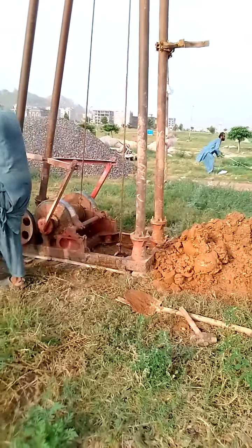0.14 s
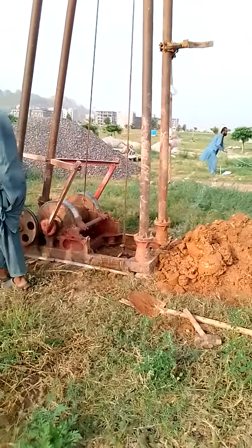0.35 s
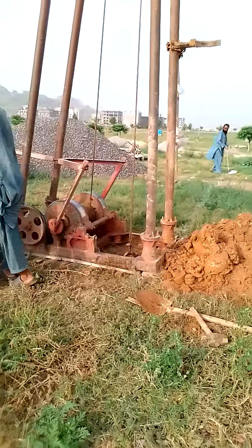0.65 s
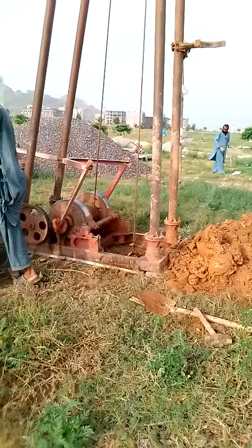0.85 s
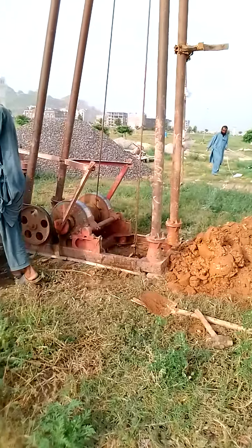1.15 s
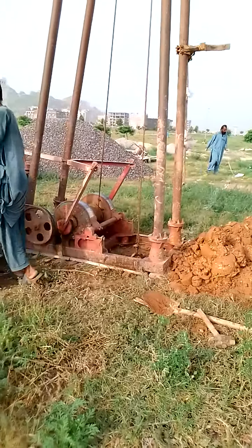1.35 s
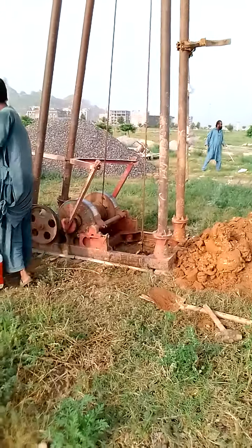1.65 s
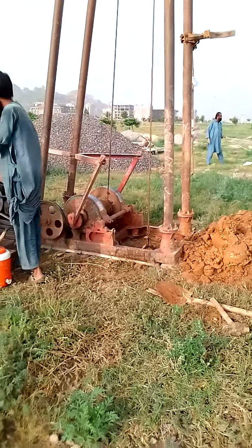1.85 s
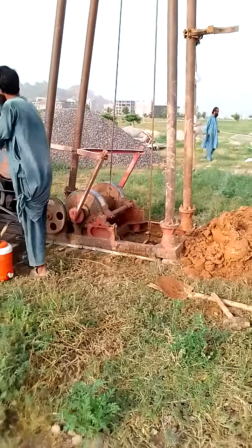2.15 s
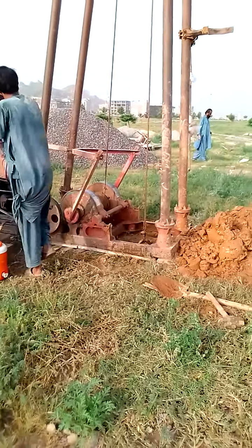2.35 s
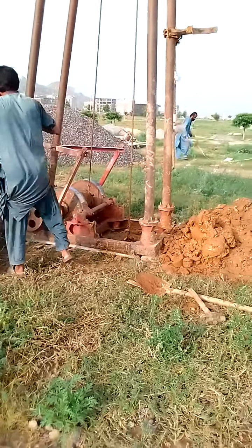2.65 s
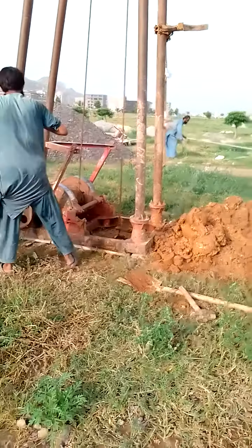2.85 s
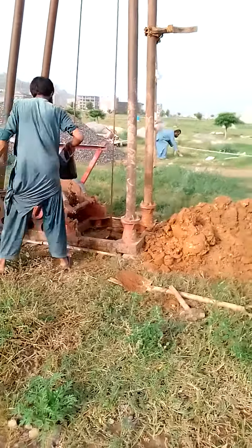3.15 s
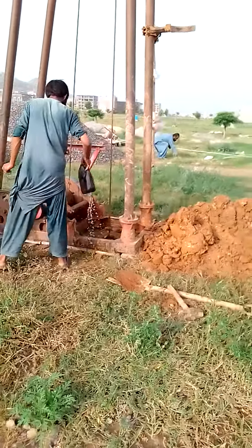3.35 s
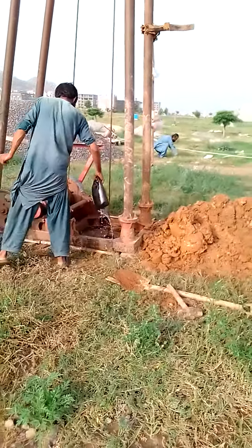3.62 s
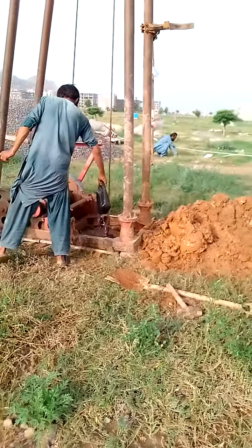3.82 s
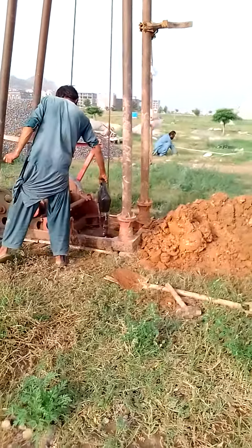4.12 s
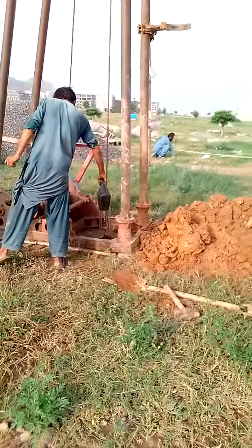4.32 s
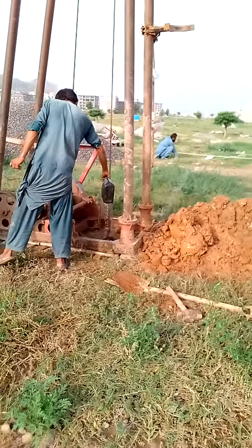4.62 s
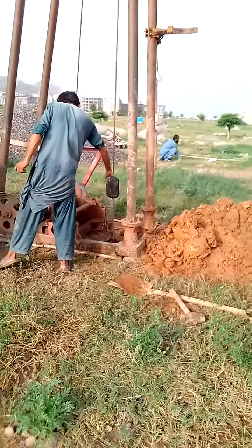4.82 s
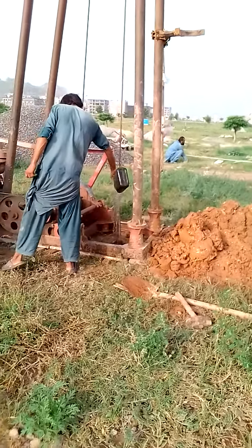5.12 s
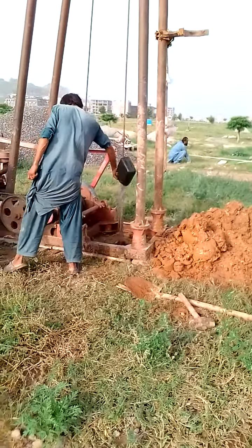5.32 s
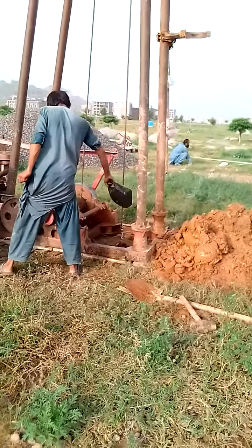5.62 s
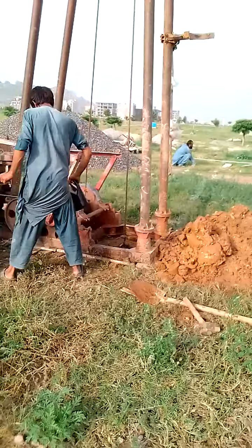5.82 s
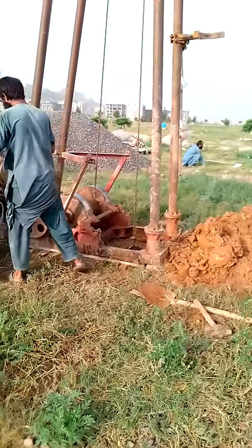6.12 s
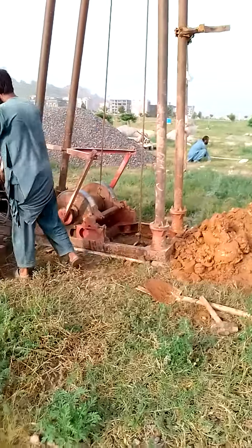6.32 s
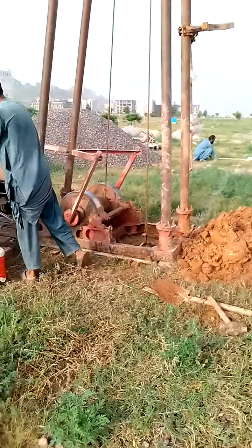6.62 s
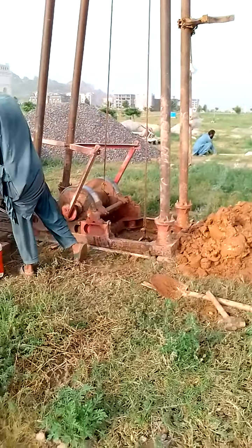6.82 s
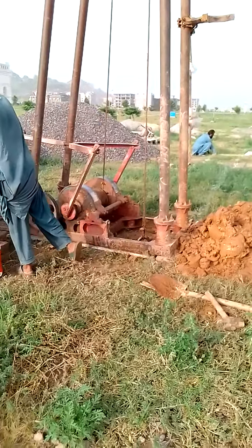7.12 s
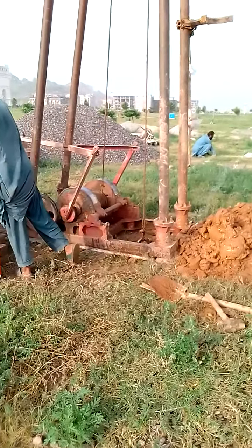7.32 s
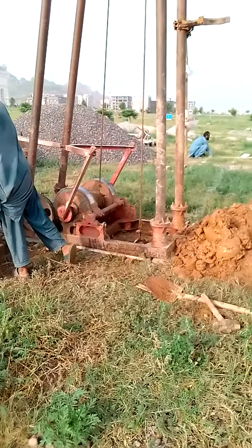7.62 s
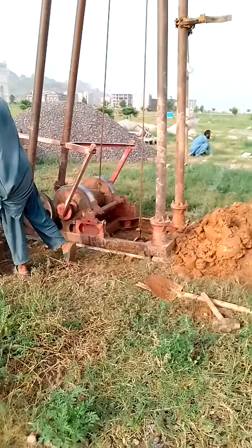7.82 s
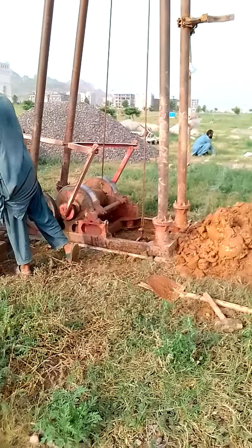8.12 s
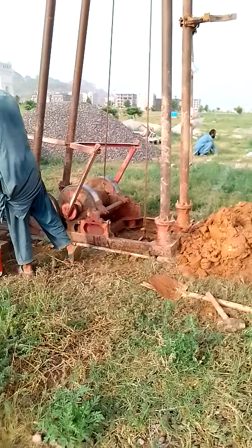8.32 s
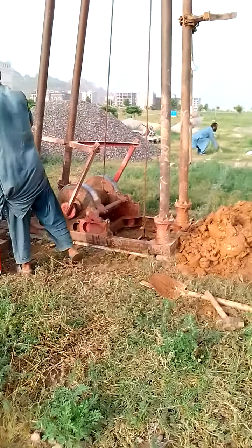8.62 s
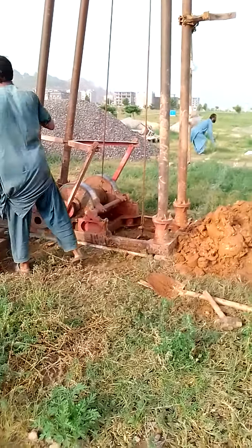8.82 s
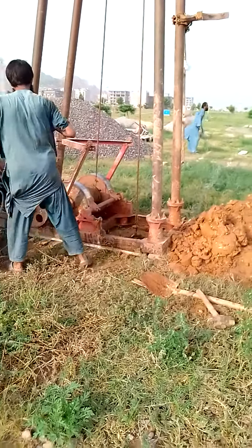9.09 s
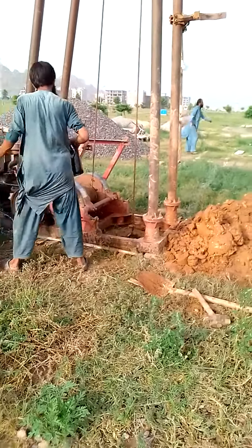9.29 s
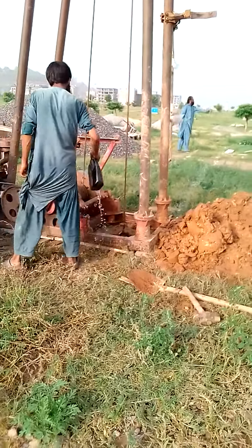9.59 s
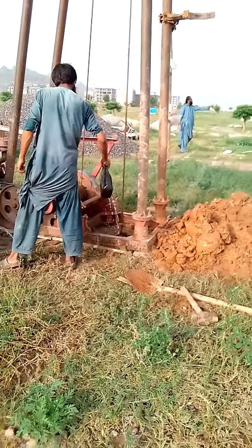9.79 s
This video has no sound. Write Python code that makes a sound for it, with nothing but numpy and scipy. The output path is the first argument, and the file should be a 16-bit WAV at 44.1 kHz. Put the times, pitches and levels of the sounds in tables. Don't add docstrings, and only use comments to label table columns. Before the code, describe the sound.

Close outdoor idle of an old one-cylinder engine: fast even chugging, iron knocks and valve ticks over gear whirr, a thin can rattling near the end.

```python
import sys
import numpy as np
from scipy import signal
from scipy.fft import rfft, irfft
from scipy.io import wavfile
from scipy.ndimage import uniform_filter1d

SR = 44100
rng = np.random.default_rng(int(sys.argv[2]) if len(sys.argv) > 2 else 0)


def output_pcm(signal):
    pcm = np.clip(np.atleast_2d(signal).T, -1, 1) * 32767
    wavfile.write(sys.argv[1], SR, np.round(pcm).astype(np.int16))


def voltage_ratio(level):
    return 10 ** (np.asarray(level, float) / 20)


N = 438794

THIRD_THUMPS = [-0.0355, 0.6058, 1.2501, 1.8948, 2.5398, 3.1825, 3.8283, 4.4759, 5.1188, 5.7639, 6.4104,
                7.057, 7.7037, 8.3524, 9.0048, 9.6522, 10.3020]
# (time of the knock [s], extra fuel [0-1], late light-up [0-1])
HEAVY_SHOTS = [(.064, 0.4, 0.13), (.28, 0.65, 0.17), (.493, 0.4, 0.05), (.922, 0.54, .02), (1.353, .7, 0),
               (1.997, 0.76, 0), (2.426, 0.8, 0), (2.64, .6, .35), (3.068, 1, 0.22), (3.501, 0.84, 0.13),
               (4.148, 0.9, .02), (4.578, 0.98, 0), (4.796, .8, 1), (5.22, 0.53, 0), (5.441, 0.73, 0.26),
               (5.649, 0.66, 0), (5.87, 0.63, 0.23), (6.296, 1, 0), (6.73, 1, 0.64), (7.16, 1, .1),
               (7.59, 0.83, 0.14), (8.023, 0.82, 0.08), (8.46, 0.7, .2), (8.893, 1, 0), (9.321, 0.98, 0),
               (9.76, 1, 0.12)]

# (frequency [Hz], level [dB])
AIR_COLOUR = [(35, -18), (55, 3), (90, 2), (160, -2), (300, -9), (1000, -30.)]

# (frequency [Hz], width [Hz], then level [dB] under
CASTING_MODES = [(238.4, 52.5, 17.5, 16, 4, 19, -1, 1.5), (267, 41, 23.5, -10, -1, 14, 16.5, 0.5),
                 (331.2, 28.8, 10.5, 11, 21.5, 26.5, 8, 5.5), (403, 253, 6.5, 10, -31, -4, -38, -4.5),
                 (572, 64, 17, -31, -18, 4.5, 20, -11), (710.5, 107, 11.5, -29, 7.5, 22, -10, 2.5),
                 (829, 84, -1, 7, 14.5, 16.5, -41, -0.5), (974, 210, 3, -11, 11.5, -10, -27, -3),
                 (1218, 161, 3, -2, 14.5, 12, -23, -7), (1470, 300, -11, -41, -27, -4.5, -13, -11.5),
                 (1680, 430, -4, 2.5, -6, -17, -5, -13.5), (2200, 720, -3, -3, -10, 2.5, -4, -14.5),
                 (2830, 268, 5.5, -26, 9.5, -6, -1, -9), (3053, 150, -0.5, -15, 6.5, 6.5, 8, -16),
              (3578, 500, 6.5, -2, 5.5, 0, 2, -12.5), (3996, 540, 3, 10.5, 8.5, 0, 0, -13.5),
              (4469, 162, 12, 20.5, 2.5, -7, 23, -19), (4707, 156, 8, 16, 7.5, 1, 8, -14.5),
              (5350, 310, 5, 5, 8.5, -6.5, 13.5, -20.5), (5850, 680, 4.5, 1, 0, -13, 4.5, -24),
              (6390, 290, 4, 20, -15, -24, -14, -16.5), (6984, 3100, -1.5, -20, -14, -1.5, -5, -17.5),
              (8860, 1000, 2, 11.5, 3, -6, -3, -18), (10700, 5100, -9, 0, -9, -9, -11, -13.5),
              (12900, 3200, 3.5, 12.5, -3, -21, -0.5, -21), (14600, 1500, 2, 7, -13, 1, -24, -11.5),
                 (596.7, 6.8, 5, -16, 13, 18.5, 19.5, -12), (723, 24, 12.5, -24, -6, 22, -19, -7.5),
               (2974, 52, -4, -13, 14.5, -0.5, -4, -10), (14900, 610, 1, 9, -8., -6., 2, -20)]
# (place in the cycle [0-1], timing scatter [s], rise [s], decay [s],
# tail decay [s], tail [dB], gain [dB])
BLOWS = [
    (-.042, 0.00087, 0.0022, 0.012, 0.0085, -13.5, -47.5),
    (0.242, 0.00049, 0.0014, 0.0044, 0.0048, -15, 5),
    (0.458, 0.001, 0.0011, 0.008, 0.038, -18, -0.67),
    (0.497, 0.00022, 0.0019, 0.0043, 0.028, -15, 0.16),
    (0.667, 0.0006, 0.0011, 0.0034, 0.038, -19.5, -4),
]
# (lag [s], rise [s], decay [s], gain [dB])
EDGES = [(-.001, 0.00066, 0.0046, 5), (-.0005, 0.0004, 0.009, 1), (0.0025, .001, 0.007, -4),
         (-0.0035, .001, 0.0032, -4), (.006, 0.0025, 0.0061, 4)]
# (lean level [dB], body gain at full fuel [dB], edge gain at full fuel [dB],
# scatter [dB])
STRENGTHS = [(-0.05, -0.1, .1, 0.84), (-57, -0.5, -0.2, 0.5), (-46, 2, 5, 0.86), (-55.5, 11.5, 10, 0.3),
             (-47.5, 0.5, 15, 0.6)]
LATE_CHANGES = [.1, .1, -12, 4, .1]
# (place in the cycle [0-1], level [dB])
ROCKER_TICKS = [(-.085, -56.5), (.212, -64.5), (0.421, -63), (0.569, -79)]
# (time [s], treble [dB])
LINE_OF_SIGHT = [(0, 2.5), (.45, 2.5), (.75, -1.5), (2.799, -0.1), (3.201, 2.5), (4.6, 2.5), (5.948, 2.5),
                 (6.3, -1), (7.5, -0.7), (9.101, -1.8), (9.4, 2), (9.95, 3)]

# (place in the cycle [0-1], frequency [Hz], t60 [s],
# level [dB])
GULPS = [(.70, 72.8, 0.073, -67.5), (.235, 131, 0.027, -63), (0, 82, 0.03, -69), (0, 131, 0.024, -57),
         (.5, 84, 0.052, -82)]
# (frequency [Hz], t60 [s], signed size)
PIPE_MODES = [(127, .08, -.042), (183, .12, -.008), (301, .078, .074), (335, .072, -.062)]

# (frequency [Hz], level [dB], t60 [s])
CAN_MODES = [(4770, 0., .33), (3800, -11., .25), (4830, -4., .2)]
# (time [s], level [dB])
CAN_SHAKING = [(0, -41), (9.4, -46), (9.52, -10), (9.7, -15), (9.95, -13)]
# (time [s], level [dB])
CAN_TAPS = [(9.4898, -23), (9.5806, -17), (9.80, -24), (9.921, -17)]
# (time [s], level [dB])
GUARD_SHAKING = [(0, -41), (.6, -49), (1.4, -47), (2.1, -44.5), (2.798, -47.5), (5, -53), (6.999, -46),
                 (9.95, -47)]
# (time [s], level [dB])
LOUD_PINGS = [(1.997, -50), (2.163, -45), (2.167, -47), (2.254, -48), (2.807, -49), (3.328, -49)]
# (time [s], level [dB])
SNAPS = [(2.6763, -44), (3.4825, -62), (3.536, -52), (9.5124, -58), (9.5267, -54), (9.5627, -57),
         (9.5981, -52), (9.624, -55), (9.7244, -58)]
# (time [s], level [dB])
BAR_STRIKES = [(2.6782, -35), (9.4898, -52), (9.581, -47)]
# (frequency [Hz], level [dB], t60 [s])
BAR_MODES = [(3570, -5, 0.054), (4700, -23, 0.047), (4920, -3.5, 0.052), (5540, -12, .05), (4160, 0, .02),
             (3800, -14, 0.022), (5300, -2, 0.022), (9200, -5, .02)]
# (time [s], level [dB])
DRUM_SLACK = [(3.51, -54), (4.155, -46), (4.586, -47), (4.797, -41), (5.018, -48), (5.232, -47),
              (5.66, -53), (6.74, -52), (8.9, -45)]
# (frequency [Hz], level [dB], t60 [s])
DRUM_MODES = [(745, .1, .08), (690, -6, .16), (598, -9, .3)]

# (frequency [Hz], level [dB])
MIC_COLOUR = [(30, -3), (60, 0.), (5000, 0.), (7000, -15), (10000, -18.5), (15000, -13.5), (20000, -22)]

TOP_OCTAVE_HZ = 7000


def level(x, db):
    return x * voltage_ratio(db) / np.sqrt(np.mean(x ** 2))


def glide(table):
    s, value = np.transpose(table)
    return np.interp(np.arange(N) / SR, s, value)


def walk(rate):
    count = int(N / SR * rate) + 2
    return 0.93 * np.interp(np.arange(N) * rate / SR, np.arange(count), rng.standard_normal(count))


def colour(x, table):
    hz, db = np.transpose(table)
    grid = np.maximum(np.fft.rfftfreq(4096, 1 / SR), 1)
    curve = voltage_ratio(np.interp(np.log(grid), np.log(hz), db))
    cepstrum = irfft(np.log(curve))
    cepstrum[1:2048] *= 2
    cepstrum[2049:] = 0
    return signal.fftconvolve(x, irfft(np.exp(rfft(cepstrum))))[:N]


def highpass(x, order, hz):
    return signal.sosfilt(signal.butter(order, hz, "high", fs=SR, output="sos"), x)


def ring(x, hz, t60, turn=-1j):
    pole = np.exp(2j * np.pi * hz / SR - np.log(1000) / (t60 * SR))
    return (turn * signal.lfilter([1], [1, -pole], x)).real


def ring_modes(x, modes):
    return sum(voltage_ratio(db) * ring(x, hz, t60) for hz, db, t60 in modes)


def spikes(s, size):
    at = np.asarray(s) * SR
    keep = (at >= 0) & (at < N - 2)
    whole, part = at[keep].astype(int), at[keep] % 1
    size = (size * np.ones(len(at)))[keep]
    return np.bincount(whole, size * (1 - part), N) + np.bincount(whole + 1, size * part, N)


def taps(table):
    s, db = np.transpose(table)
    return spikes(s, voltage_ratio(db))


def blow(s, db, rise, decay, tail, tail_db):
    kicks = spikes(s, voltage_ratio(db))

    def fade(rate):
        return signal.lfilter([1], [1, -np.exp(-rate / SR)], kicks)

    def swell(fall):
        return fade(1 / fall) - fade(1 / fall + 1 / rise)

    return swell(decay) + voltage_ratio(tail_db) * swell(tail)


def thumps():
    marks = 3 * np.arange(len(THIRD_THUMPS))
    return np.interp(np.arange(marks[-1]), marks, THIRD_THUMPS)


def moments(place):
    s = thumps()
    return s + place * np.diff(s, append=2 * s[-1] - s[-2])


def fuel(axis=1):
    table = np.transpose(HEAVY_SHOTS)
    cycle = np.searchsorted(thumps(), table[0]) - 1
    return np.bincount(cycle, table[axis], len(thumps()))


def field_air():
    return level(colour(rng.standard_normal(N), AIR_COLOUR), -94) * voltage_ratio(2.3 * walk(5.2))


def forces(treble_db):
    extra, late = fuel(), fuel(axis=2)
    body, top = [], []
    for hit, sharp, strength, late_db in zip(BLOWS, EDGES, STRENGTHS, LATE_CHANGES):
        place, scatter, *shape, gain_db = hit
        lag, *edge, edge_db = sharp
        lean_db, body_db, sharp_db, spread_db = strength
        s = moments(place) + scatter * rng.standard_normal(len(extra))
        db = gain_db + lean_db + spread_db * rng.standard_normal(len(s))
        db = db + 0.3 * np.interp(s, np.arange(N) / SR, treble_db) + late_db * late
        body.append(blow(s, db + body_db * extra, *shape))
        top_db = db + sharp_db * extra + edge_db - 1.5
        top.append(blow(s + lag, top_db, *edge, tail=0.0055, tail_db=-20.0))
    for place, db in ROCKER_TICKS:
        tick_db = db + 2.7 * rng.standard_normal(len(extra))
        body[2] = body[2] + blow(moments(place), tick_db, 0.00095, 0.0048, 0.022, tail_db=-16)
    clumps = voltage_ratio(2.4 * walk(1200))
    gear = voltage_ratio(-49 + 2.0 * walk(12) + 1.4 * walk(300))
    teeth = gear * voltage_ratio(1.3 * walk(150) - 1.0)
    body_forces = np.array([force * clumps for force in body] + [gear])
    top_forces = np.array([force * clumps for force in top] + [teeth])
    return body_forces, top_forces


def casting():
    treble_db = glide(LINE_OF_SIGHT)
    body, top = forces(treble_db)
    starts = thumps() * SR
    cycle = np.searchsorted(starts, np.arange(N), "right") - 1
    since = np.arange(N) - starts[cycle].astype(int)
    knots = np.append(np.arange(0, N, SR // 20), N - 1)
    fresh, out = rng.standard_normal(N), 0
    for hz, width, *dbs in CASTING_MODES:
        repeated = rng.standard_normal(SR // 4)[since]
        shaking = 0.63 * repeated + 0.7 * np.roll(fresh, rng.integers(N))
        spread_db = 1.9 if 1600 < hz < TOP_OCTAVE_HZ else 1.3
        spot_db = spread_db * rng.standard_normal(len(knots)) + treble_db[knots] * min(hz / 9000, 1)
        spot = np.interp(np.arange(N), knots, voltage_ratio(spot_db))
        force = voltage_ratio(np.array(dbs)) @ (top if hz > TOP_OCTAVE_HZ else body)
        mode = signal.lfilter(*signal.iirpeak(hz, hz / width, fs=SR), force * spot * shaking)
        if hz < TOP_OCTAVE_HZ:
            mode = signal.lfilter(*signal.iirpeak(hz, hz / width / 3.74, fs=SR), mode)
        out = out + mode
    return voltage_ratio(3.0) * highpass(out, 4, 185)


def low_gulps():
    out = 0
    for place, hz, t60, db in GULPS:
        s = moments(place)
        gulp = spikes(s, voltage_ratio(db + 1.6 * rng.standard_normal(len(s))))
        soft = ring(gulp, hz, t60)
        out = out - ring(soft, hz, t60, turn=0.81) * hz / 3000
    return out


def can(iron):
    shake = voltage_ratio(glide(CAN_SHAKING)) * iron + taps(CAN_TAPS)
    return voltage_ratio(-37) * ring_modes(shake, CAN_MODES)


def guard(iron):
    shake = voltage_ratio(glide(GUARD_SHAKING)) * iron + taps(LOUD_PINGS)
    return ring(shake, 4405., 0.075)


def exhaust():
    out, times = np.zeros(N + SR), thumps()[1:]
    dbs = -44 + 1.5 * fuel()[:-1] + .5 * rng.standard_normal(len(times))
    kick = np.zeros(SR // 10)
    for s, db in zip(times, dbs):
        kick[0] = voltage_ratio(db + 43.0)
        heat = 1 + .006 * rng.standard_normal()
        pipe = 0
        for hz, t60, size in PIPE_MODES:
            share = voltage_ratio(.3 * rng.standard_normal())
            pipe = pipe + size * share * ring(kick, hz * heat, t60)
        start = int((s - .0076) * SR)
        out[start:start + len(kick)] += ring(pipe, 233, .065, turn=1) / 200
    return out[:N]


def can_snaps():
    s, db = np.transpose(SNAPS)
    burst = blow(s, db + 10.0, 0.00029, 0.0015, 0.017, tail_db=-7.0)
    return burst * np.diff(rng.standard_normal(N + 1))


def bar():
    s, db = np.transpose(BAR_STRIKES)
    hits = spikes(s, voltage_ratio(db)) + spikes(s + .006, voltage_ratio(db - 24.0)) + spikes(s + 0.01, voltage_ratio(db - 30.0))
    return highpass(ring_modes(hits, BAR_MODES), 3, 3000)


def drum():
    push = uniform_filter1d(taps(DRUM_SLACK), size=24)
    return highpass(ring_modes(push, DRUM_MODES), 2, 450)


def scene():
    air = field_air()
    iron = casting()
    rig = can(iron) + guard(iron) + can_snaps() + bar() + drum()
    return (air + iron + low_gulps() + exhaust() + rig)[None]


def band_limit(x):
    return signal.sosfilt(signal.butter(12, 16470, fs=SR, output="sos"), x)


def record(dry):
    top_cut = signal.ellip(10, .3, 60, 15850, fs=SR, output="sos")
    heard = signal.sosfilt(top_cut, colour(dry[0], MIC_COLOUR))
    mix = heard[None] - 1e-4
    return band_limit(mix)


dry = scene()
out = record(dry)
output_pcm(out)
```